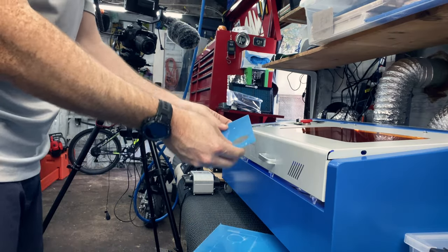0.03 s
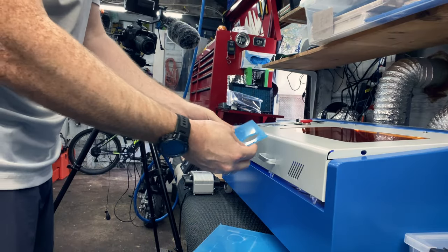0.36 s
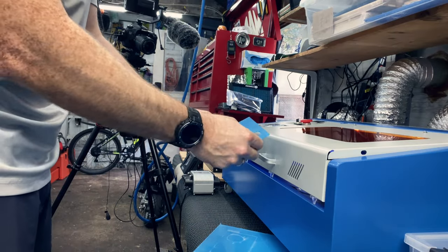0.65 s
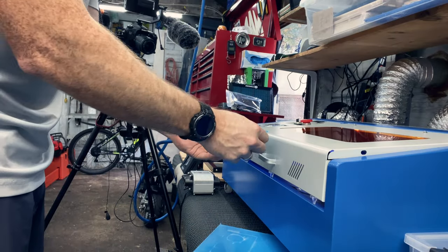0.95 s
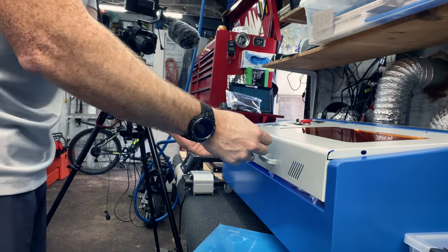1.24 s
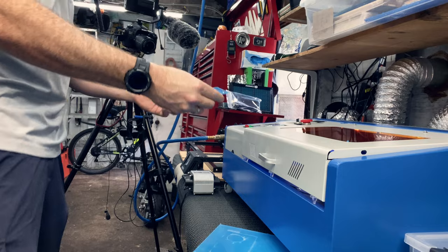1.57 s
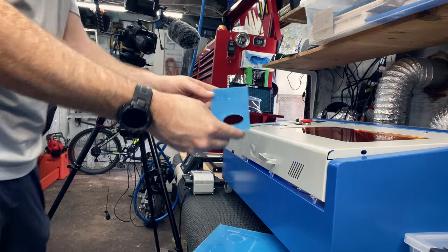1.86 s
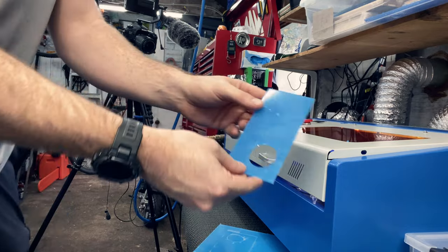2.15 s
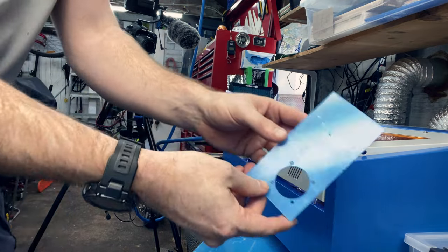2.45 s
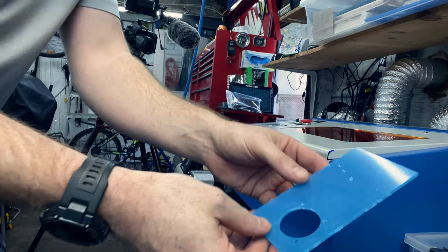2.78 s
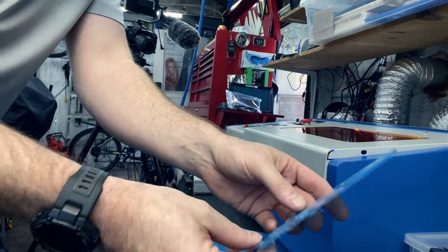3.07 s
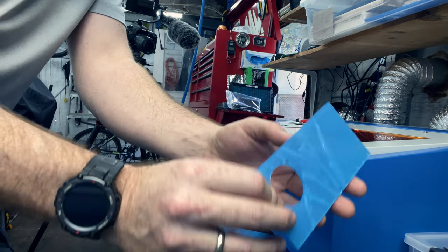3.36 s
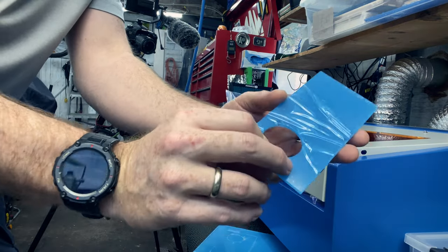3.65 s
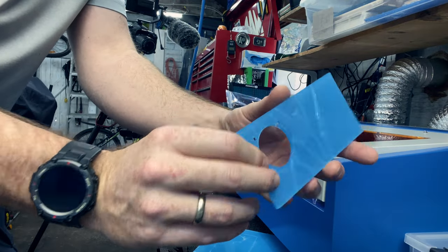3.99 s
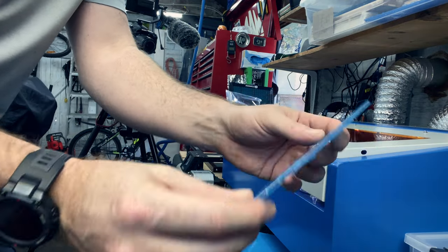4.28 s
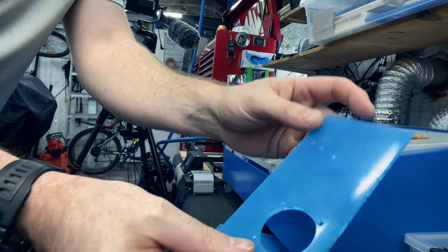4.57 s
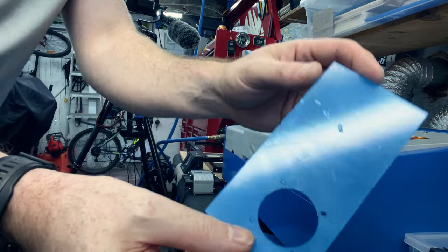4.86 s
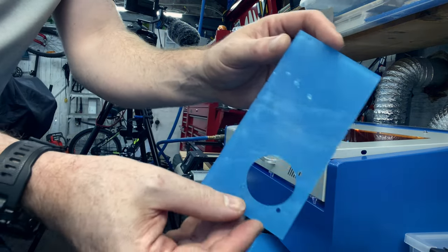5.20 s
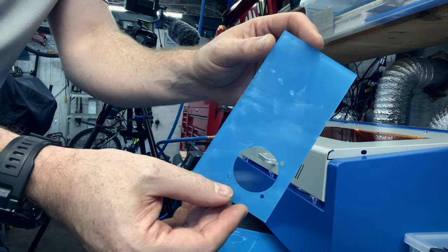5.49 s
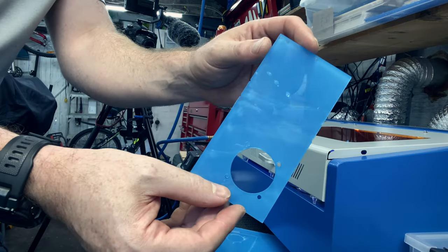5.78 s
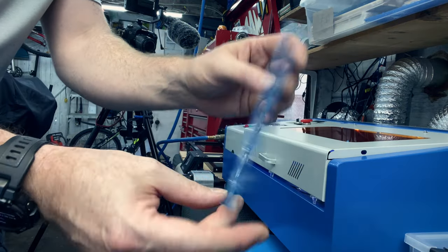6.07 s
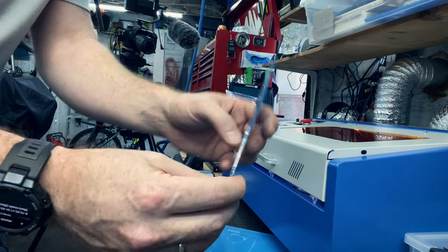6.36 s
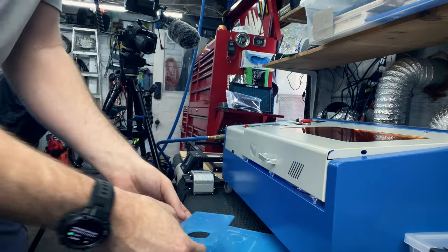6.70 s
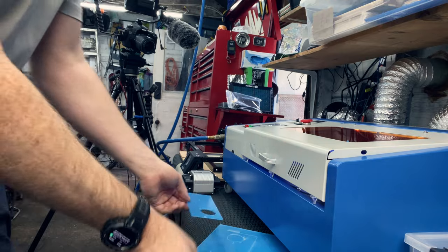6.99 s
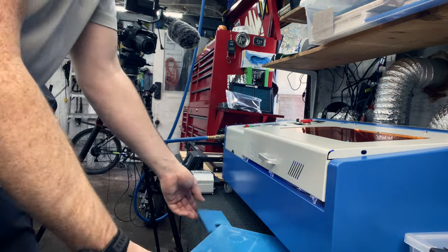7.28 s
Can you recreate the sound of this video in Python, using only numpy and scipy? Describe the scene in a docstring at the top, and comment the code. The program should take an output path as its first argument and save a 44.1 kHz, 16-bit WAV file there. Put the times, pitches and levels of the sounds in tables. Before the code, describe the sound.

A desktop laser cutter runs close by in a small workshop. From the start, its exhaust fan and pumps give a low hum with rushing, roaring duct air, and a thin air jet hisses above it with a high, fluttering whistle. The hum throbs unevenly, most strongly at around 1 second. At about 1.4 seconds the sound steps down abruptly: the roar stops and a sizzling edge fades over the next second. The quieter hum, airflow and whistling hiss then continue steadily, with a soft pulse two or three times a second. A low pump drone recedes after the step and comes back gently from about 4.4 seconds. At around 7.2 to 7.3 seconds a plastic sheet is put down, making a few quick, soft, dull knocks over the still running machine.

```python
"""A small workshop, a desktop laser cutter idling. Exhaust fan, two pumps and mains hum and beat
over rushing duct air; a thin air jet hisses, with a cluster of whistling resonances near 8 kHz.
The sound steps down after about 1.4 s. At the end a plastic sheet is put down: a few dull knocks."""
import sys
import numpy as np
from scipy import signal
from scipy.fft import rfft, irfft, next_fast_len
from scipy.io import wavfile

SR = 44100
rng = np.random.default_rng(int(sys.argv[2]) if len(sys.argv) > 2 else 0)


def dump_mix(stems):
    """Bounce the given channels to the path in sys.argv[1] as a 16-bit WAV at rate SR."""
    frames = np.atleast_2d(stems).T  # one column per channel
    limited = np.clip(frames, -1, 1)  # hard clip at full scale
    pcm = np.round(limited * 32767).astype(np.int16)
    wavfile.write(sys.argv[1], SR, pcm)


N = 323601
TIME_S = np.arange(N) / SR
FFT_SIZE = next_fast_len(N)
BINS_HZ = np.maximum(np.fft.rfftfreq(FFT_SIZE, 1 / SR), 1)

FAN_HZ, AIR_PUMP_HZ, WATER_PUMP_HZ, MAINS_HZ = 74.75, 49.1, 66.6, 60
STEP_S, STEP_LENGTH_S = 1.42, 0.006
SINCE_STEP_S = np.maximum(TIME_S - STEP_S, 0)


def from_db(db):
    """Decibels to gain."""
    return np.exp(np.asarray(db) * (np.log(10) / 20))


def over_hz(points):
    """Curve interpolated over log frequency."""
    hz, value = np.transpose(points)
    return np.interp(np.log(BINS_HZ), np.log(hz), value)


def panned(pan_db):
    """Constant-power stereo gains; pan is left minus right."""
    gains = from_db(np.array([[.5], [-.5]]) * pan_db)
    return gains / np.sqrt(np.mean(gains ** 2, axis=0))


def drift(rate_hz):
    """Slow random wander, standard deviation 1."""
    hop, settle = 100, 2000
    pole = np.exp(-2 * np.pi * rate_hz * hop / SR)
    noise = rng.standard_normal(N // hop + settle + 2)
    slow = signal.lfilter([1], [1, -2 * pole, pole * pole], noise)[settle:]
    return np.interp(np.arange(N) / hop, np.arange(len(slow)), slow / slow.std())


def resonances(modes):
    """Power density of steep-skirted peaks."""
    return sum(from_db(db) ** 2 / (1 + 2 * ((BINS_HZ - hz) / width_hz) ** 2) ** 2
               for hz, width_hz, db in modes)


def reflections(longest_s, ripple_db, count=60):
    """Spectral power ripple from echoes off nearby hard surfaces; mean 1."""
    delay, strength = rng.random((count, 2)).T
    echoes = np.zeros(FFT_SIZE)
    echoes[((.1 + delay) * longest_s * SR).astype(int)] = strength - .5
    comb = rfft(echoes).real
    power = from_db(ripple_db * comb / comb.std()) ** 2
    return power / power.mean()


def turbulence(power, coherence, pan, left_phasor=1):
    """Stereo noise of given power density: shared direct part plus diffuse room part."""
    direct, *diffuse = rfft(rng.standard_normal((3, FFT_SIZE)))
    share = np.clip(over_hz(coherence), 0, 1)
    pair = np.sqrt(share) * np.array([direct * left_phasor, direct])
    pair += np.sqrt(1 - share) * np.array(diffuse)
    return irfft(pair * panned(over_hz(pan)) * np.sqrt(power * SR / 2), FFT_SIZE)[:, :N]


def motor(hz, orders, wander_hz, waver_db, roar_share=0):
    """Orders of one shaft of wandering speed; each wavers in level and shifts with the roar."""
    lag_s = np.array([[.00022], [0]])   # left, right
    turns = np.cumsum(hz + wander_hz * drift(1.61)) / SR - hz * lag_s
    out = 0
    for order, db, pan_db, roar_db in orders:
        wave = np.sin(2 * np.pi * (order * turns + rng.random()))
        rms = from_db(db + roar_db * roar_share + waver_db * drift(3.5))
        out = out + np.sqrt(2) * rms * panned(pan_db) * wave
    return out


def hum(roar_share):
    """Fan, water pump, mains and small motors run at unrelated rates, so their orders beat."""
    # machine harmonics: order, level/dB, pan/dB, change in roar/dB
    fan_orders = [(1, -52, -2, 2), (3, -52, 7, 5.5), (4, -44, -8.5, 1), (6, -59.5, 12, -5),
                  (7, -51, 13, 6.5), (12, -64, -19, 5), (20, -61, 20, 4)]
    pump_orders = [(1, -56, 2, -5), (2, -54.5, -9, 3), (4, -58.5, 0, -2), (5, -53, 29, 1.5)]
    mains_orders = [(2, -52, -10, 1), (4, -51.5, -8, 5.5), (6, -56, 10, 2.5), (8, -67, -7, 13)]
    # small-motor whines: f/Hz, level/dB, pan/dB, change in roar/dB
    whine_tones = [(153.2, -57, -1, 0), (247.5, -52, 0, 8), (273, -62, 0, 4), (535.2, -49.5, -10, 3.5),
                   (656.5, -59, 3, -14), (734.3, -56.5, 5, -4)]
    fan = motor(FAN_HZ, fan_orders, wander_hz=.04, waver_db=.8, roar_share=roar_share)
    pump = motor(WATER_PUMP_HZ, pump_orders, wander_hz=.08, waver_db=1.2, roar_share=roar_share)
    mains = motor(MAINS_HZ, mains_orders, wander_hz=0, waver_db=1, roar_share=roar_share)
    whines = sum(motor(hz, [(1, *levels)], wander_hz=.4, waver_db=2.2, roar_share=roar_share)
                 for hz, *levels in whine_tones)
    return fan + pump + mains + whines


def duct(roar_share):
    """Air rushes through fan and hose and rings the cabinet; roar stops at the step, sizzle fades."""
    # airflow spectrum: f/Hz, density/dB
    rush_spectrum = [(25, -89), (42, -85), (60, -82), (90, -75.5), (130, -62), (190, -72), (290, -67),
                     (420, -73.5), (560, -70), (760, -73.5), (1050, -77.5), (2000, -81.5), (2900, -89.5),
                     (3600, -84.5), (4400, -94), (16000, -178)]
    # cabinet, roar and sizzle resonances: f/Hz, width/Hz, density/dB
    cabinet_modes = [(126, 14, -71), (151, 40, -67.5), (357, 18, -67.5), (842, 17, -76), (928, 21, -80),
                     (1320, 20, -72), (1490, 29, -74.5), (1834, 42, -78.5), (2002, 53, -76.5),
                     (2193, 41, -76.5), (2464, 44, -78.5), (2664, 48, -79), (2887, 33, -77),
                     (3120, 31, -77.5)]
    roar_modes = [(126, 16, -64), (171, 16, -63), (228, 40, -65.5), (270, 30, -60.5), (338, 22, -65),
                  (456, 34, -66), (500, 50, -68), (534, 18, -57.5), (568, 30, -65)]
    sizzle_modes = [(3200, 1400, -86), (4860, 130, -78), (5250, 150, -71.5), (5620, 120, -69.5),
                    (5790, 70, -73), (6150, 320, -73)]
    # left-right likeness: f/Hz, coherence/0-1
    coherence = [(60, .96), (190, .95), (320, .7), (480, .4), (700, .15), (1000, .2), (1300, .45),
                 (2200, .2), (3500, .3), (6000, .1)]
    # balance: f/Hz, pan/dB
    pan = [(60, 3), (200, -1.5), (400, -13.5), (750, 2.5), (1300, 0.5), (4000, 1)]
    swell_start_s, swell_db_per_s, sizzle_fade_s = 3.3, .13, .78
    ripple = reflections(longest_s=.012, ripple_db=1.2)
    ripple = ripple ** np.minimum(BINS_HZ / 2000, 1)   # long waves bend round the clutter
    power = from_db(over_hz(rush_spectrum)) ** 2 * ripple + resonances(cabinet_modes)
    rush_db = .9 * drift(25) + swell_db_per_s * np.maximum(TIME_S - swell_start_s, 0)
    rush = turbulence(power, coherence, pan) * from_db(rush_db)
    roar_and_sizzle = turbulence(resonances(roar_modes) + resonances(sizzle_modes), coherence, pan)
    roar = signal.sosfiltfilt(signal.butter(2, 2000, fs=SR, output="sos"), roar_and_sizzle)
    sizzle = roar_and_sizzle - roar
    sizzle_share = np.maximum(roar_share, .98 * np.exp(-(SINCE_STEP_S / sizzle_fade_s) ** 2))
    return rush + roar_share * roar + sizzle_share * sizzle


def air_jet(before_step):
    """Small fluttering jet: a point source, later and inverted on the left."""
    # broad hiss: f/Hz, density/dB
    hiss_spectrum = [(2000, -100), (4200, -84), (4800, -87.5), (5600, -79), (6000, -78.5), (6300, -72),
                     (7150, -69), (7560, -72), (8350, -66), (9300, -67.5), (9750, -70), (10300, -115.5),
                     (11400, -68.5), (13300, -74), (15100, -68)]
    # whistling resonances: f/Hz, width/Hz, density/dB
    whistle_modes = [(4380, 70, -83), (4610, 80, -81), (5240, 110, -81), (5610, 80, -76), (5790, 60, -76),
                     (7115, 30, -69), (7232, 36, -67), (7298, 34, -65), (7366, 22, -66), (7693, 30, -60),
                     (7843, 36, -55.5), (7919, 22, -62), (7983, 28, -54), (8094, 46, -56),
                     (8252, 38, -54.5), (8322, 30, -58), (8385, 26, -62), (8452, 40, -60),
                     (8620, 28, -60.5), (8812, 22, -63), (9002, 55, -63.5), (9620, 45, -66),
                     (11580, 120, -73), (12620, 160, -70.5), (13500, 90, -71), (13660, 70, -69),
                     (14530, 90, -69), (15020, 70, -68)]
    # left-right likeness: f/Hz, coherence/0-1
    coherence = [(4000, .15), (6000, .33), (7500, .96), (8200, .98), (9000, .88), (11500, .92),
                 (15000, .92)]
    # balance: f/Hz, pan/dB
    pan = [(4000, 0.17), (7200, 1.8), (7700, 0.12), (15000, -0.028)]
    lag_s, start_db, sink_db, sink_s = .000192, .77, 1.75, 4
    linger_db, linger_s, dull_db, recovery_db_per_s = 10, .045, -4, .44
    ripple = reflections(longest_s=.014, ripple_db=1.7)
    power = from_db(over_hz(hiss_spectrum)) ** 2 * ripple + resonances(whistle_modes)
    hiss = turbulence(power, coherence, pan, left_phasor=-np.exp(-2j * np.pi * BINS_HZ * lag_s))
    top = signal.sosfiltfilt(signal.butter(6, 10500, "high", fs=SR, output="sos"), hiss)
    whistling = (hiss - top) * from_db(.77 * drift(21))
    # top: -1 dB before the step; then lingers, dulls, slowly recovers
    after_db = linger_db * np.exp(-SINCE_STEP_S / linger_s) + dull_db + recovery_db_per_s * SINCE_STEP_S
    top_db = -1 * before_step + (1 - before_step) * after_db
    airy = top * from_db(top_db + .6 * drift(24))
    jet_db = start_db - sink_db * np.minimum(TIME_S / sink_s, 1)
    return (whistling + airy) * from_db(jet_db)


def throb():
    """Beat near 150 Hz: the air pump's third order slips one cycle per throb behind the fan's second."""
    # moments of fan and pump in phase: t/s, peak level/dB
    throbs = [(0.0, -33.5), (0.36, -35), (0.54, -29), (0.74, -35.5), (1.05, -25.5), (1.2, -38),
              (1.78, -38.5), (2.2, -35), (2.57, -34.5), (3.0, -40), (3.38, -37.5), (3.72, -37), (4.1, -42),
              (4.42, -35.5), (4.72, -43.5), (5.02, -46), (5.48, -39.5), (5.97, -34), (6.28, -40.5),
              (6.66, -36), (7.0, -41), (7.32, -32)]
    times_s, peaks_db = np.transpose(throbs)
    envelope = from_db(np.interp(TIME_S, times_s, peaks_db))
    slip = np.interp(TIME_S, times_s, np.arange(len(throbs)))
    cycles = 2 * FAN_HZ * TIME_S + rng.random()
    pump_gain = from_db(-8.5)
    pair = np.sin(2 * np.pi * cycles) + pump_gain * np.sin(2 * np.pi * (cycles - slip))
    return envelope * pair / (1 + pump_gain) * panned(-1.3)


def air_pump():
    """Drone at twice the stroke rate; fades after the step, then returns."""
    # drone envelope: t/s, level/dB
    envelope = [(0.0, -42), (0.5, -58), (0.8, -49), (1.3, -49), (1.6, -60), (2.6, -60), (3.5, -63),
                (4.4, -51), (6.3, -49.5), (7.25, -46)]
    drone_db = np.interp(TIME_S, *np.transpose(envelope))
    return motor(AIR_PUMP_HZ, [(2, drone_db, -1.8, 0)], wander_hz=.17, waver_db=3)


def sheet_knocks():
    """Edge taps and soft flat thuds of a plastic sheet; each strikes every mode with its own strength."""
    # impacts: t/s, level/dB, tilt/(dB/octave)
    impacts = [(7.202, -43, 17), (7.209, -29, 4), (7.219, -26, 6), (7.234, -25, -3), (7.2445, -29.5, 2),
               (7.299, -30.5, 8.5), (7.307, -30, 6), (7.324, -33, 6)]
    # struck modes: f/Hz, level/dB, t60/s
    modes = [(98, -12, 0.1), (133, -3, 0.06), (181, 3.5, 0.11), (252, -2, 0.046), (380, -8, 0.067),
             (444, -7.5, 0.061), (523, -6, 0.038), (720, -11.5, 0.03), (820, -19, 0.035), (960, -28, 0.034)]
    pivot_hz, spread_db = 300, 5
    times_s, impact_db, tilt_db_per_oct = np.transpose(impacts)
    onsets = (times_s * SR).astype(int)
    scatter_db = spread_db * rng.standard_normal((len(onsets), len(modes)))
    ringing = np.zeros(N)
    for k, (hz, db, t60_s) in enumerate(modes):
        clicks = np.full(N, 1e-18)   # floor avoids denormals
        tilt_db = tilt_db_per_oct * np.log2(hz / pivot_hz)
        clicks[onsets] = from_db(impact_db + db + tilt_db + scatter_db[:, k])
        radius, angle = from_db(-60 / (t60_s * SR)), 2 * np.pi * hz / SR
        feedback = [1, -2 * radius * np.cos(angle), radius ** 2]
        ringing += (-1) ** k * signal.lfilter([0, np.sin(angle)], feedback, clicks)
    # small sheet: little bass; soft landing: no treble
    band = signal.butter(2, [85, 1600], "band", fs=SR, output="sos")
    return signal.sosfilt(band, ringing * panned(-.6))


def workshop(sound, t60_s, wet_db):
    """Adds a short diffuse room tail, different on each side."""
    age_s = np.arange(SR // 2) / SR
    tail = rng.standard_normal((2, len(age_s))) * from_db(-60 * age_s / t60_s)
    tail /= np.sqrt(np.sum(tail ** 2, axis=1, keepdims=True))
    return sound + from_db(wet_db) * signal.fftconvolve(sound, tail, axes=1)[:, :N]


def scene():
    """Hum, duct and jet step down together; throb, drone and knocks keep their own levels."""
    step_db, creep_db_per_s = 6.5, .2
    before_step = np.clip(1 - SINCE_STEP_S / STEP_LENGTH_S, 0, 1)
    level_db = before_step * (step_db + creep_db_per_s * (TIME_S - STEP_S))
    machine = from_db(level_db) * (hum(before_step) + duct(before_step) + air_jet(before_step))
    return machine + throb() + air_pump() + workshop(sheet_knocks(), t60_s=.2, wet_db=-9)


def record(dry):
    """Microphone: bass roll-off below 50 Hz, steep cut above 15.2 kHz."""
    thin = signal.sosfilt(signal.butter(4, 50, "high", fs=SR, output="sos"), dry)
    return signal.sosfilt(signal.ellip(12, .1, 90, 15200, fs=SR, output="sos"), thin)


dry = scene()
out = record(dry)
dump_mix(out)
```